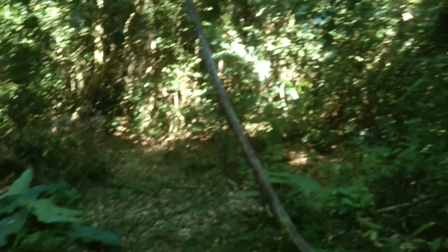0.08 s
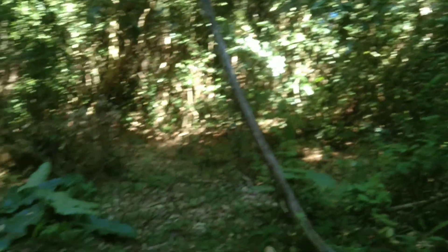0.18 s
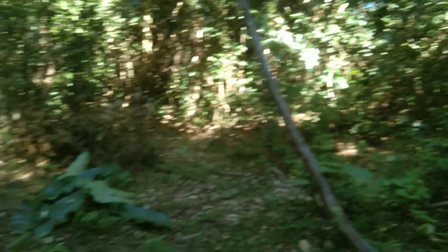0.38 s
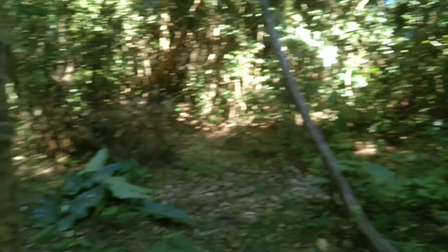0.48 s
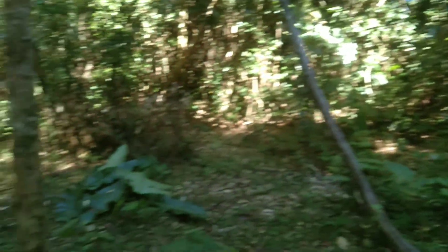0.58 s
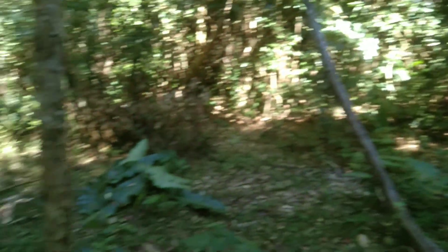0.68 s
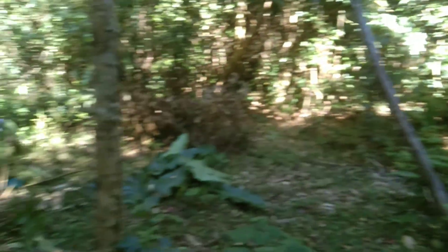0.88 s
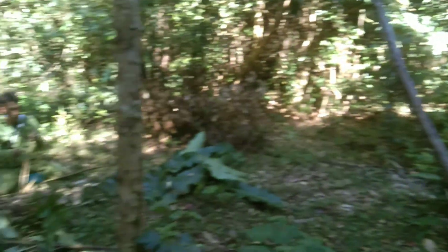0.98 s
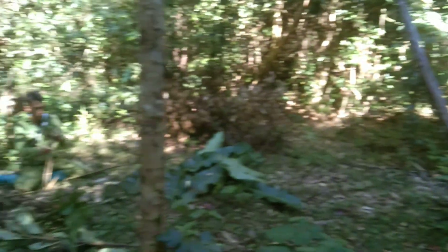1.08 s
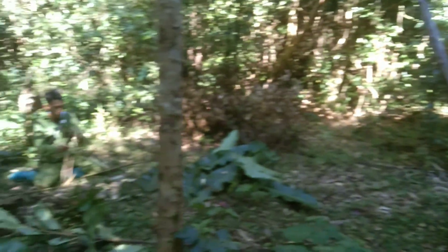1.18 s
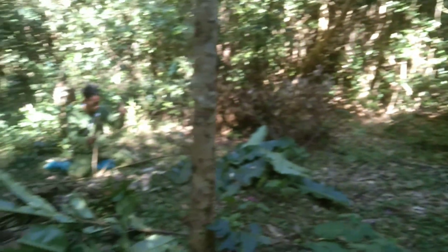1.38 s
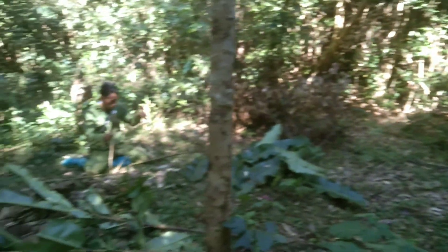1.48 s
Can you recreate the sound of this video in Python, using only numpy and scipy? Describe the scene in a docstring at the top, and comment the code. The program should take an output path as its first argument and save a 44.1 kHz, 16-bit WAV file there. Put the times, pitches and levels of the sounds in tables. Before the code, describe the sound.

A footstep crushes dry leaf litter with sharp twig cracks, then dull steps and faint insects

```python
"""A forest hums softly from the start, with a very faint, shrill insect: both are filtered noise.
After one faint, dull footfall, a step into dry leaves and twigs crunches harder and harder, then fades.
Tiny clicks make the crunch, ringing tones the cracking twigs and knocking stick; the trees echo them.
More soft footfalls follow: low falling tones, noise pats and a faint rustle, with a few faint cracks.
Meanwhile the far-off insect grows clearer and two short, lower notes join it."""
import sys
import numpy as np
from scipy import signal
from scipy.fft import rfft, irfft
from scipy.io import wavfile

SR = 44100
rng = np.random.default_rng(int(sys.argv[2]) if len(sys.argv) > 2 else 0)


def to_wav(sig):
    """Store sig (one row per channel, or 1-D mono) as 16-bit WAV at the path in sys.argv[1].

    Samples outside -1..1 are clipped; the rate is SR.
    """
    pcm = np.clip(np.atleast_2d(sig), -1, 1) * 32767
    pcm = np.round(pcm).astype(np.int16)
    wavfile.write(sys.argv[1], SR, pcm.T)  # frames by channels


N = 66150  # samples in the scene: 1.5 s
T = np.arange(N) / SR  # time of each sample [s]


def from_db(db):
    """Turn decibels into a gain."""
    return 10 ** (np.asarray(db) / 20)


def rms_one(x):
    """Scale to an average (RMS) level of one."""
    return x / np.sqrt(np.mean(x ** 2) + 1e-20)


def level_curve(rows):
    """Gain through time, from (time [s], level [dB]) points."""
    return from_db(np.interp(T, *np.transpose(rows)))


def at_hz(points, hz):
    """Read a table between its points, on a log-frequency axis."""
    table_hz, values = np.transpose(points)
    return np.interp(np.log(np.maximum(hz, 1)), np.log(table_hz), values)


def colour(x, spectrum):
    """Filter to the given tone colour, with unit power gain and no sound before its cause."""
    gain = rms_one(from_db(at_hz(spectrum, np.arange(N + 1) * SR / (2 * N))))
    # folding the cepstrum forward in time gives a minimum-phase filter
    cepstrum = irfft(np.log(gain))
    cepstrum[1:N] *= 2
    cepstrum[N + 1:] = 0
    response = np.exp(rfft(cepstrum))
    return irfft(rfft(x, 2 * N) * response)[:N]


def since(start):
    """Seconds since a moment, zero before it."""
    return np.maximum(T - start, 0)


def strike(start, rise, t60):
    """Loudness shape of a hit: a quick rise, then a fade of 60 dB in t60 seconds."""
    decay_db = np.maximum(-60 * since(start) / t60, -300)
    return (1 - np.exp(-since(start) / rise)) * from_db(decay_db)


# tone colour of the forest background: (frequency [Hz], level [dB per Hz])
AIR_COLOUR = [(25, -4), (45, -10.5), (85, -0.5), (160, -5.5), (300, -10.5), (800, -17.5), (1300, -19.5),
              (3300, -22.5), (5100, -33), (6000, -20), (7300, -35.5), (12000, -38.5), (15000, -36.5)]
# loudness of the forest background: (time [s], level [dB])
AIR_LEVEL = [(0, -66), (0.08, -66), (0.16, -71), (0.5, -65.5), (0.83, -65), (0.97, -66.5), (1.2, -64.5),
             (1.5, -65)]


def forest_air():
    """The forest background is random noise with most of its strength in the bass."""
    return level_curve(AIR_LEVEL) * colour(rng.standard_normal(N), AIR_COLOUR)


def buzz(hz, width_hz):
    """A narrow band of noise at unit level, heard as a wavering note."""
    edges = [hz - width_hz / 2, hz + width_hz / 2]
    band = signal.butter(2, edges, "band", fs=SR, output="sos")
    return rms_one(signal.sosfilt(band, rng.standard_normal(N)))


# loudness of the distant shrill insect: (time [s], level [dB])
SHRILL_LEVEL = [(0, -87), (0.83, -81.5), (0.87, -75.5), (1.0, -78), (1.04, -69.5), (1.25, -71.5),
                (1.5, -75.5)]
SHRILL_HZ, SHRILL_WIDTH_HZ = 6220, 230
THROBS_PER_S, THROB_DB = 42, 3  # the level swings this far up and down
# short, lower insect notes: (start [s], end [s], pitch [Hz], width [Hz], level [dB])
LOW_NOTES = [(0.82, 1.08, 4290, 170, -77), (0.865, 0.935, 2860, 260, -76)]
NOTE_FADE_S = 0.0091


def insects():
    """One shrill insect throbs throughout; two short, lower notes fade in and out."""
    throb = rms_one(from_db(THROB_DB * np.sin(2 * np.pi * THROBS_PER_S * T)))
    out = level_curve(SHRILL_LEVEL) * throb * buzz(SHRILL_HZ, SHRILL_WIDTH_HZ)
    for start, end, hz, width_hz, db in LOW_NOTES:
        gate = np.clip(np.minimum(T - start, end - T) / NOTE_FADE_S, 0, 1)
        out = out + from_db(db) * gate * buzz(hz, width_hz)
    return out


# weight lands on soft soil: (time [s], level [dB], settled pitch [Hz], rustle level [dB])
FOOTFALLS = [(0.04, -54.5, 250, -71), (0.283, -51, 93, -83), (0.315, -46.5, 95.3, -73),
             (0.335, -50, 78, -74), (0.354, -48, 97, -82), (0.641, -51.5, 107, -66.5),
             (1.027, -44.5, 92, -61.5), (1.049, -51, 102, -65.5), (1.082, -55.5, 93, -69),
             (1.165, -43, 92, -62), (1.312, -42, 93.5, -61.5)]
THUD_RISE_S, THUD_T60_S = 0.0012, 0.082
THUD_BEND, THUD_SETTLE_S = 1.0, 0.004  # a bend of 1 starts at twice the settled pitch


def thuds():
    """Soil gives way with a short, low tone that quickly sags in pitch."""
    out = 0
    for start, db, hz, _ in FOOTFALLS:
        bend = THUD_BEND * THUD_SETTLE_S * (1 - np.exp(-since(start) / THUD_SETTLE_S))
        cycles = hz * (since(start) + bend)
        out = out + from_db(db) * strike(start, THUD_RISE_S, THUD_T60_S) * np.sin(2 * np.pi * cycles)
    return out


HIT_RISE_S = 0.00022  # onset of sole pats, cracks and knocks
CONTACT_DB, CONTACT_T60_S = -9.5, 0.049  # level is relative to the footfall
# tone colour of the sole meeting the ground: (frequency [Hz], level [dB per Hz])
CONTACT_COLOUR = [(60, -12), (180, 8), (280, 7), (420, -11), (1200, -14), (4000, -20.5), (8000, -35),
                  (15000, -45)]


def contacts():
    """The sole meets the ground with a short, dull burst of noise."""
    pats = sum(from_db(db + CONTACT_DB) * strike(start, HIT_RISE_S, CONTACT_T60_S)
               for start, db, _, _ in FOOTFALLS)
    return colour(pats * rng.standard_normal(N), CONTACT_COLOUR)


RUSTLE_RISE_S, RUSTLE_T60_S = 0.0013, 0.71
# tone colour of the faint rustle after a footfall: (frequency [Hz], level [dB per Hz])
RUSTLE_COLOUR = [(60, -5.5), (200, 8.5), (400, -1.5), (600, 5), (1200, -6.5), (3500, -4), (5000, -9.5),
                 (6300, -4), (7500, -19.5), (12000, -30), (15000, -28)]


def rustle():
    """Leaves stir after each footfall: slowly fading noise whose powers add up."""
    power = sum((from_db(db) * strike(start, RUSTLE_RISE_S, RUSTLE_T60_S)) ** 2
                for start, _, _, db in FOOTFALLS)
    return colour(np.sqrt(power) * rng.standard_normal(N), RUSTLE_COLOUR)


# force of the foot on the litter, as loudness of the crunch: (time [s], level [dB])
FOOT_PRESS = [(0.2095, -77), (0.2155, -44.5), (0.235, -40.5), (0.256, -40.5), (0.277, -36), (0.288, -33),
              (0.311, -35.5), (0.322, -41.5), (0.352, -47), (0.385, -78.5)]
GRAINS_PER_S, GRAIN_SPREAD_DB = 6000, 1
# tone colour of breaking leaves: (frequency [Hz], level [dB per Hz])
LEAF_COLOUR = [(100, -30.5), (300, -18.5), (1000, -14.5), (2000, -5.5), (2700, -13.5), (3350, 1.5),
               (3900, -0.5), (4400, -2), (5300, -1.5), (6900, -7), (8200, -22), (12000, -36), (15000, -34)]


def crunch():
    """Thousands of tiny leaf fractures a second, as strong as the foot presses."""
    sizes = from_db(GRAIN_SPREAD_DB * np.minimum(rng.exponential(1, N), 3))
    signs = rng.choice([-1, 1], N)
    breaks_now = rng.random(N) < GRAINS_PER_S / SR
    grains = rms_one(sizes * signs * breaks_now)
    return colour(grains * level_curve(FOOT_PRESS), LEAF_COLOUR)


def ring(start, hz, t60):
    """One damped vibration of dry wood."""
    return strike(start, HIT_RISE_S, t60) * np.sin(2 * np.pi * hz * since(start))


# twigs and leaf stalks crack: (time [s], level [dB], ring pitch [Hz], ring t60 [s])
TWIG_CRACKS = [(0.2096, -36, 3350, 0.016), (0.2138, -30.5, 3130, 0.0037), (0.2207, -28.5, 2230, 0.0067),
               (0.2262, -27.5, 3730, 0.0023), (0.2407, -27, 4370, 0.011), (0.2563, -30, 3620, 0.024),
               (0.264, -36, 3300, 0.0027), (0.2738, -26, 3700, 0.026), (0.2825, -15.5, 3670, 0.0061),
               (0.2825, -18, 5560, 0.002), (0.2862, -22.5, 5240, 0.015), (0.2892, -21, 4830, 0.013),
               (0.2995, -21.5, 4130, 0.0054), (0.3074, -24.5, 5400, 0.0026), (0.3094, -20.5, 4000, 0.016),
               (0.3128, -20, 3230, 0.0075), (0.3446, -25.5, 3680, 0.0072), (0.3555, -26.5, 2185, 0.0067),
               (0.812, -52, 750, 0.011), (0.912, -58, 1850, 0.014), (0.999, -54, 2430, 0.0094),
               (1.029, -55, 1340, .006), (1.369, -50.5, 3200, 0.0056)]
# click and splintering levels are relative to the crack
CLICK_DB, SPLINTER_DB, SPLINTER_T60_S = -2, -9, 0.01
# tone colour of the click and splintering: (frequency [Hz], level [dB per Hz])
SPLINTER_COLOUR = [(80, -19.5), (300, -13), (1200, -11), (2500, -10), (3400, 4), (6500, -3.5), (8200, -16),
                   (11000, -24), (12500, -63), (15000, -31)]


def cracks():
    """Each twig breaks with one sharp click, splinters and rings briefly at its own pitch."""
    rings = sum(from_db(db) * ring(start, hz, t60) for start, db, hz, t60 in TWIG_CRACKS)
    bursts = sum(from_db(db + SPLINTER_DB) * strike(start, HIT_RISE_S, SPLINTER_T60_S)
                 for start, db, _, _ in TWIG_CRACKS)
    clicks = np.zeros(N)
    for start, db, _, _ in TWIG_CRACKS:
        clicks[int(start * SR)] += from_db(db + CLICK_DB)
    splinters = bursts * rng.standard_normal(N)
    return rings + colour(clicks + splinters, SPLINTER_COLOUR)


# a stick knocks on the ground: (time [s], level [dB], pitch [Hz], t60 [s])
STICK_KNOCKS = [(0.2832, -45.5, 570, 0.054), (0.3113, -22.5, 612, 0.02), (0.3144, -31, 437, 0.029),
                (0.3221, -37, 554, 0.023), (0.3438, -30.5, 1570, .012), (0.3552, -33, 982, 0.017),
                (0.3565, -39.5, 425, .025)]
# ways the stick vibrates: (multiple of the pitch, level [dB], share of the t60)
STICK_MODES = [(.62, -5.5, 0.3), (1.0, -0.5, 1.0), (1.25, -7, 0.88), (1.85, -1.5, 0.4), (3.5, -6.5, 0.57)]


def knocks():
    """A thicker stick knocks hollowly: several quickly damped vibrations at once."""
    out = 0
    for start, db, hz, t60 in STICK_KNOCKS:
        for k, (ratio, mode_db, share) in enumerate(STICK_MODES):
            sign = (-1) ** (k + 1)  # neighbouring modes swing in opposite directions
            out = out + sign * from_db(db + mode_db) * ring(start, hz * ratio, t60 * share)
    return out


# strength of the echoes among the trees: (frequency [Hz], level [dB])
ECHO_LEVEL = [(70, 18.5), (200, -3), (500, -17), (1200, -13.5), (2000, -14), (2900, -3), (4000, -25.5),
              (5300, -14.5), (6600, -10.5), (15000, -12.5)]
# how long the echoes last: (frequency [Hz], t60 [s])
ECHO_T60 = [(80, 1.0), (500, 0.82), (2800, 0.72), (6000, 0.59), (12000, 0.6)]
ECHO_BUILD_S = 0.005


def trees(x):
    """Trunks and foliage scatter diffuse echoes: fading noise, with the bass lasting longest."""
    edges = np.geomspace(50, 16000, 15)
    echo = 0
    for low, high in zip(edges, edges[1:]):
        hz = np.sqrt(low * high)
        band = signal.butter(2, [low, high], "band", fs=SR, output="sos")
        noise = signal.sosfilt(band, rng.standard_normal(N))
        tail = rms_one(noise * strike(0, ECHO_BUILD_S, at_hz(ECHO_T60, hz)))
        # give each band its share of the echo power
        band_gain = np.sqrt(2 * (high - low) / SR / N)
        echo = echo + from_db(at_hz(ECHO_LEVEL, hz)) * tail * band_gain
    return signal.fftconvolve(x, echo)[:N]


def scene():
    """The forest and its insects, the soft footfalls, and the crunching step with its echoes."""
    background = forest_air() + insects()
    footfalls = thuds() + contacts() + rustle()
    step = crunch() + cracks() + knocks()
    return (background + footfalls + step + trees(step))[None]


LOW_CUT_HZ, CUTOFF_HZ = 51, 15600


def record(dry):
    """The deep bass below about 50 Hz is taken away; the top is cut steeply."""
    bass_cut = signal.butter(2, LOW_CUT_HZ, "high", fs=SR, output="sos")
    thin = signal.sosfilt(bass_cut, dry)
    top_cut = signal.ellip(12, 0.2, 70, CUTOFF_HZ, fs=SR, output="sos")
    return signal.sosfilt(top_cut, thin)


dry = scene()
out = record(dry)
to_wav(out)
```